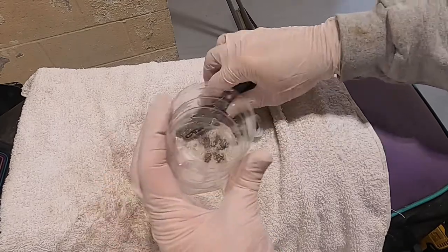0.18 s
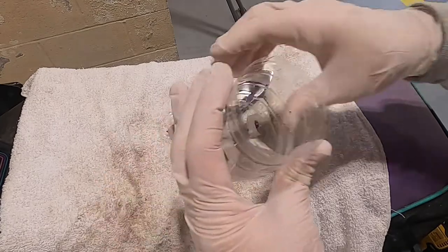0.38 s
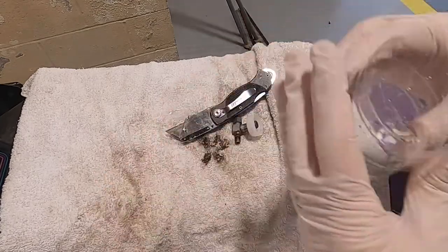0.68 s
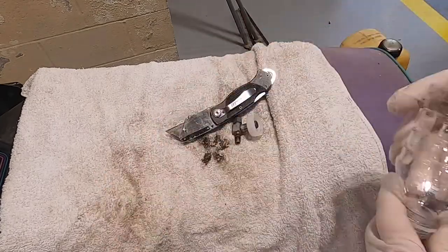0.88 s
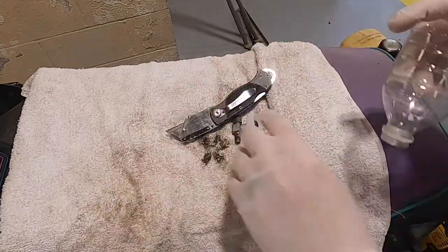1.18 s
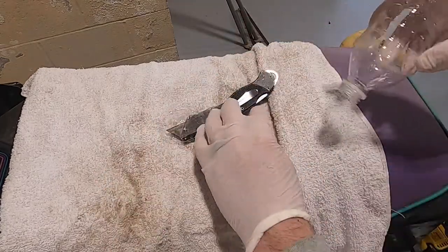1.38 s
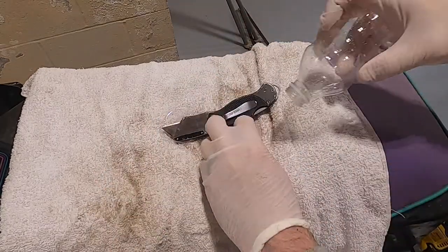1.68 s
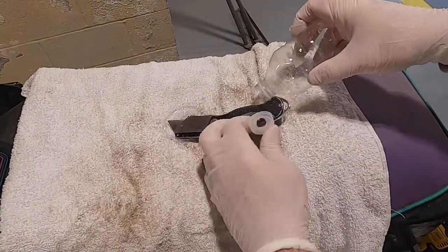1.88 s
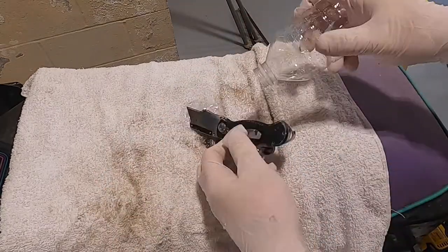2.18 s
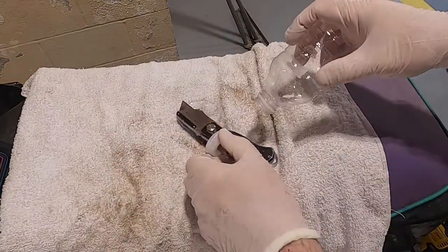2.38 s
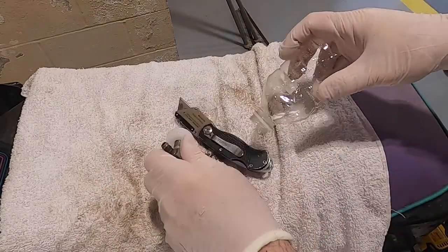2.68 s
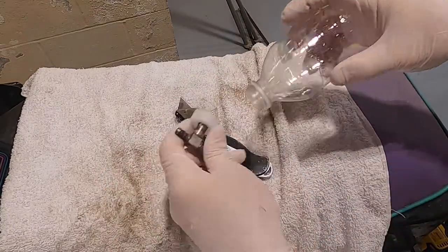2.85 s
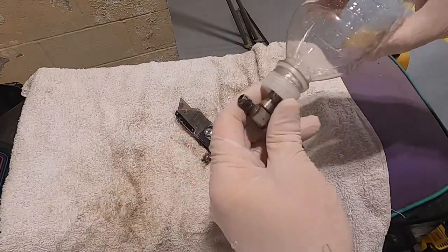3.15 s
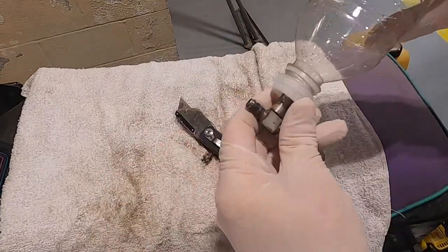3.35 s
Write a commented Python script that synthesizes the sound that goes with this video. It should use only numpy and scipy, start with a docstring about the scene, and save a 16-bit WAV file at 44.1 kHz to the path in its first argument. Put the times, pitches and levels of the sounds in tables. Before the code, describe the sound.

A squeezed plastic bottle clicks and crinkles, pops loudly once, then gets light taps at its neck

```python
"""In a quiet workshop, air noise, soft hiss and a low hum (which fades early) lie under a table's low sway.
Gloved hands turn a thin plastic bottle over a towel-covered table: filtered noise makes their rubs and scuffs.
From 0.22 s its wall snaps (damped tones with a noise crack), and creases crackle and tick (runs of tiny slips).
Near 1.9 s the whole bottle pops (body tones and airy noise); snaps return at 2.35 s and 2.69 s, the last
with the strongest of several soft table bumps. From 3.1 s a metal fitting taps and scrapes in the neck."""
import sys
import numpy as np
from scipy import signal
from scipy.fft import rfft, irfft, next_fast_len
from scipy.io import wavfile
from scipy.ndimage import uniform_filter1d, map_coordinates

SR = 44100
rng = np.random.default_rng(int(sys.argv[2]) if len(sys.argv) > 2 else 0)


def log_audio(samples):
    """Write samples as a 16-bit WAV file to the path given in sys.argv[1]."""
    # one column per channel
    frames = np.atleast_2d(samples).T
    # limit to full scale, then quantise
    limited = np.clip(frames, -1, 1)
    pcm = np.round(limited * 32767).astype(np.int16)
    wavfile.write(sys.argv[1], SR, pcm)


N = 154350  # samples: 3.5 s


def amp(db):
    """Turn decibels into a gain."""
    return 10 ** (np.asarray(db) / 20)


def unit(x):
    """Scale to an rms of 1."""
    return x / np.sqrt(np.mean(x ** 2) + 1e-20)


def with_energy(x, energy):
    """Scale x to a given sum of squares."""
    return x * np.sqrt(energy / (np.sum(x ** 2) + 1e-20))


def seconds(length):
    """Make a time axis in seconds."""
    return np.arange(int(length * SR)) / SR


def along(points, hz):
    """Read (f/Hz, value) points on a log frequency axis."""
    f, value = np.transpose(points)
    return np.interp(np.log(hz + 1), np.log(f + 1), value)


def curve(rows):
    """Read (t/s, value) points at every sample."""
    return np.interp(np.arange(N) / SR, *np.transpose(rows))


def wobble(rate):
    """Make a smooth random curve with `rate` knots a second."""
    knots = rng.standard_normal(int(N * rate / SR) + 4)
    return map_coordinates(knots, [np.arange(N) * rate / SR])


def add(track, s, x):
    """Mix x into the track at time s."""
    part = track[max(round(s * SR), 0):][:len(x)]
    part += x[:len(part)]


def noise(points):
    """Make steady noise of rms 1 with the given spectrum."""
    m = next_fast_len(N + SR // 4)
    spectrum = rfft(rng.standard_normal(m)) * amp(along(points, np.fft.rfftfreq(m, 1 / SR)))
    return unit(irfft(spectrum, m)[:N])


def dying(t60, t):
    """Make noise that falls by 60 dB in t60 seconds."""
    return rng.standard_normal(len(t)) * amp(-60 * t / t60)


def ring(modes, t):
    """Add up damped sines from (f/Hz, level/dB, t60/s) rows."""
    return sum(amp(db - 60 * t / t60) * np.sin(2 * np.pi * hz * t) for hz, db, t60 in modes)


def colour(x, points, lift=lambda hz: 0, size=4096):
    """Filter x with the given spectrum plus a lift in dB, without any sound ahead of its cause."""
    hz = np.fft.rfftfreq(size, 1 / SR)
    cepstrum = irfft(np.log(amp(along(points, hz) + lift(hz)) + 1e-6))
    # folding the cepstrum forward in time gives a minimum-phase filter
    cepstrum[1:size // 2] *= 2
    cepstrum[size // 2 + 1:] = 0
    response = irfft(np.exp(rfft(cepstrum)))
    return signal.fftconvolve(x, response)[:len(x)]


def resonance(centre_hz, lift_db, width, tilt_db):
    """Shape a bell in dB (width in octaves) on a slope in dB per octave."""
    def lift(hz):
        octaves = np.log2((hz + 1) / centre_hz)
        bell = lift_db * np.exp(-(octaves / width) ** 2 / 2)
        return bell + tilt_db * np.clip(octaves, -2, 2)
    return lift


# spectrum of the room's air noise: f/Hz, level/dB
AIR = [(180, 6), (300, 7.5), (620, -11.5), (1020, 7), (1420, -3.5), (3000, -33), (5000, -27), (9000, -25),
       (15000, -41.5)]
AIR_DB = -67
# spectrum of the soft hiss: f/Hz, level/dB
HISS = [(300, -8), (700, -2), (1300, 0.5), (2900, 1), (4500, -3.5), (7300, -12.5), (9200, -14.5),
        (12000, -28.5), (14000, -35), (15200, -49)]
# middle level of the hiss, before its waver: t/s, level/dB
HISS_LEVEL = [(0, -58.5), (.15, -63), (.7, -66), (1.2, -66.5), (1.5, -64.5), (2.8, -66.5), (2.97, -68.5),
              (3.05, -75.5), (3.17, -71.5), (3.3, -65), (3.41, -80), (3.5, -66)]
HISS_WAVER_DB = 1.8
# tones of a distant machine: f/Hz, level/dB
HUM = [(72, -51), (146, -62)]
# rise and fall of the hum, added to its tones' levels: t/s, level/dB
HUM_LEVEL = [(0, 4.5), (.6, 6), (1.2, -1), (1.6, -19.5), (3.5, -51)]


def workshop():
    """Steady air noise, a hiss of wavering level, and hum tones whose phase drifts."""
    t = np.arange(N) / SR
    hum = sum(amp(db) * np.sin(2 * np.pi * hz * t + 1.9 * wobble(6)) for hz, db in HUM)
    hiss = amp(curve(HISS_LEVEL) + HISS_WAVER_DB * wobble(28)) * noise(HISS)
    return amp(AIR_DB) * noise(AIR) + hiss + amp(curve(HUM_LEVEL)) * hum


# spectrum of the table's low sway: f/Hz, level/dB
SWAY = [(20, -34.5), (36, -12), (48, 6), (54, 2.5), (65, -6.5), (120, -49), (400, -97)]
# level of the sway: t/s, level/dB
SWAY_LEVEL = [(0.0, -54), (0.32, -45.5), (0.37, -63), (1.19, -63), (1.42, -47), (1.48, -62), (1.66, -38.5),
              (1.74, -74), (1.84, -39), (2.1, -54), (2.19, -38.5), (2.6, -46.5), (2.69, -37), (2.9, -41),
              (2.94, -51), (3.13, -40.5), (3.3, -46), (3.5, -68)]
# spectrum of the handling rumble: f/Hz, level/dB
RUMBLE = [(30, -7), (55, -17), (72, 0), (95, -1.5), (145, -1.5), (200, -8.5), (300, -23), (500, -39),
          (1500, -62)]
# level of the rumble: t/s, level/dB
RUMBLE_LEVEL = [(0.0, -55.5), (0.17, -55.5), (0.27, -54), (0.82, -53.5), (1.11, -61.5), (1.36, -51),
                (1.5, -49.5), (1.99, -53.5), (2.1, -51.5), (2.79, -49.5), (3.5, -53.5)]
# soft bumps through hand and table: t/s, level/dB, f/Hz, t60/s
BUMPS = [(0.253, -32, 75, 0.072), (0.266, -25.5, 185, 0.051), (0.292, -27.5, 85, 0.054),
         (0.44, -32, 177, 0.071), (1.598, -42, 238, 0.16), (1.62, -35, 200, 0.048),
         (2.344, -40, 212, 0.035), (2.503, -36, 287, 0.04), (2.6925, -13.5, 84, 0.067)]
BUMP_RISE_S = 0.0022


def table():
    """Handling sways the padded table as low noise; each soft bump is a low damped sine."""
    out, t = np.zeros(N), seconds(.5)
    for s, db, hz, t60 in BUMPS:
        soft_start = 1 - np.exp(-(t / BUMP_RISE_S) ** 2)
        add(out, s, ring([(hz, db, t60)], t) * soft_start)
    sway = noise(SWAY)
    local_power = np.abs(uniform_filter1d(sway ** 2, size=6000))
    sway = unit(sway / np.sqrt(local_power + .05))  # evens out its random swells
    return out + amp(curve(SWAY_LEVEL)) * sway + amp(curve(RUMBLE_LEVEL)) * noise(RUMBLE)


GRAIN_DB, GRAINS_PER_S = 3, 1400  # typical unevenness of the grip, and its random steps a second


def grip(count):
    """The uneven grip of rubber on plastic: noise whose level jitters quickly."""
    hiss = rng.standard_normal(count)
    knots = rng.standard_normal(count // 8)
    jitter = np.interp(np.arange(count) * GRAINS_PER_S / SR, np.arange(len(knots)), knots)
    return hiss * amp(GRAIN_DB * jitter)


def swell(t, db, rise, fall):
    """Climb 20 dB over the rise to a peak at t = 0, then drop 20 dB over the fall."""
    return amp(db - 20 * np.maximum(-t / rise, t / fall))


# glove strokes: t/s of the peak, level/dB, rise/s, fall/s, main resonance f/Hz, tilt/(dB per octave)
RUBS = [(.275, -46, 0.06, 0.067, 3020, 3.5), (0.419, -49.5, 0.044, 0.16, 2720, -2.5),
        (0.624, -59, 0.03, 0.096, 3950, -5), (0.818, -48, 0.067, 0.037, 2380, 1),
        (.892, -43, 0.034, 0.046, 1570, -0.5), (.96, -50, .1, 0.21, 1840, -5),
        (.997, -41, .09, 0.024, 3990, 2), (1.064, -52, 0.051, 0.12, 4200, 4),
        (1.125, -39.5, 0.064, 0.021, 1060, -0.5), (1.19, -52.5, 0.057, .08, 1060, -6),
        (1.293, -50, 0.022, 0.11, 4500, 1), (1.609, -50, 0.33, 0.11, 1900, -2.5),
        (1.721, -45.5, 0.071, 0.08, 2430, -5.5), (1.869, -49, 0.092, 0.15, 2700, 1),
        (2.22, -52, 0.54, 0.083, 2300, 2), (2.37, -51, 0.099, 0.15, 2940, -1),
        (2.509, -84, .06, 0.046, 2900, -3), (2.641, -60, 0.046, 0.22, 3070, 4),
        (2.859, -60.5, 0.061, 0.072, 2700, 5.5), (3.484, -50.5, 0.034, .1, 850, -4.5)]
# spectrum of glove on plastic: f/Hz, level/dB
GLOVE = [(150, -2), (350, -16), (650, -11.5), (950, -0.5), (1300, 1), (1700, 0.5), (2600, -4), (4000, -2.5),
         (5200, -12.5), (6500, -14.5), (8000, -21), (9500, -21), (12000, -38.5), (15000, -39)]
RUB_DB, RUB_OCTAVES = 9, 0.078  # lift and width of a stroke's main resonance


def gloves():
    """Grainy friction swells and fades with each stroke, stressing one resonance of the plastic."""
    out, t = np.zeros(N), seconds(1) - .5
    for s, db, rise, fall, hz, tilt_db in RUBS:
        rub = colour(grip(len(t)), GLOVE, resonance(hz, RUB_DB, RUB_OCTAVES, tilt_db))
        stroke = unit(rub) * swell(t, db, rise, fall)
        add(out, s - .5, stroke[t >= -s])  # drop anything before time zero
    return out


def patchy(x, depth_db):
    """The shifting grip favours one resonance, then another: random gains over pitch and time."""
    z = signal.stft(x, nperseg=512)[2]
    field = uniform_filter1d(rng.standard_normal(z.shape), size=4, axis=0)
    field = uniform_filter1d(field, size=7, axis=1)
    return signal.istft(z * amp(depth_db * unit(field)), nperseg=512)[1][:N]


# finger pads scuff the wall: t/s of the peak, level/dB, rise/s, fall/s
SCUFFS = [(0.276, -46, 0.034, 0.043), (0.456, -52.5, 0.046, .06), (0.638, -50, 0.015, .02),
          (1.62, -54.5, 0.099, 0.11), (1.73, -51.5, 0.069, 0.085), (1.96, -61.5, .05, 0.13),
          (2.231, -52, 0.067, 0.038), (2.418, -47, .01, 0.028), (2.508, -45.5, 0.037, 0.046),
          (2.699, -44.5, 0.014, 0.043), (2.869, -57.5, 0.049, 0.043)]
# spectrum of a finger pad: f/Hz, level/dB
PAD = [(80, -12.5), (180, 4), (320, 0), (500, -6.5), (650, -12.5), (1000, -15.5), (2000, -22), (8000, -52)]
# a dragging fingertip sounds the hollow body: t/s of the peak, level/dB, rise/s, fall/s, f/Hz
DRAGS = [(0.819, -46.5, 0.034, 0.029, 1000), (.826, -41, 0.014, 0.0073, 2270),
         (.893, -53, 0.025, 0.031, 1030), (.98, -50, 0.082, 0.025, 3980), (1.125, -37, 0.012, 0.015, 1015)]
DRAG_WIDTH = 0.085  # bandwidth over pitch


def fingertips():
    """Pads scuff softly as low-coloured friction; short drags excite one narrow resonance."""
    out, t = np.zeros(N), seconds(0.42) - .25
    for s, db, rise, fall in SCUFFS:
        scuff = unit(colour(grip(len(t)), PAD))
        add(out, s + t[0], scuff * swell(t, db, rise, fall))
    for s, db, rise, fall, hz in DRAGS:
        edges = [hz * (1 - DRAG_WIDTH / 2), hz * (1 + DRAG_WIDTH / 2)]
        band = signal.butter(2, edges, 'band', fs=SR, output='sos')
        drag = unit(signal.sosfilt(band, grip(len(t))))
        add(out, s + t[0], drag * swell(t, db, rise, fall))
    return out


# the wall buckles: t/s, level/dB, panel pitch f/Hz, t60/s, crack over ring level/dB
SNAPS = [(0.2242, -7, 2940, 0.013, -9), (0.227, -16.5, 2590, 0.014, -0.5), (0.236, -24, 2720, 0.01, -2.5),
         (0.262, -14.5, 3700, 0.0086, 2.5), (.2702, -19, 2440, .011, -19), (0.3003, -24.5, 2850, .011, -10),
         (0.3602, -26, 2870, 0.016, -10), (2.3470, -6.5, 2945, 0.0088, -4.5),
         (2.354, -19, 2850, 0.0059, -2), (2.6917, -16.5, 3020, 0.004, -1)]
# spectrum of cracking plastic, also for crackles, ticks and pop: f/Hz, level/dB
PLASTIC = [(100, -45), (250, -6), (600, -24), (1000, -6.5), (1500, -3), (2200, 3), (3200, 3), (4500, 1.5),
           (6200, -12), (7300, -18.5), (9000, -21), (11500, -33), (15000, -47)]
SPLINTER_DB, SPLINTER_T60_S = -3, 0.016  # fine slips behind a snap's first crack


def snaps():
    """A panel flips: a sharp crack, fine slips behind it, and a short ring at the panel's pitch."""
    out, t = np.zeros(N), seconds(.1)
    low_cut = signal.butter(2, 1000, 'high', fs=SR, output='sos')
    for s, db, hz, t60, crack_db in SNAPS:
        panel = ring([(hz, 0, t60)], t) * (1 - np.exp(-t / 0.00022))
        panel = signal.sosfilt(low_cut, panel)
        first_crack = t == 0
        splinters = with_energy(dying(SPLINTER_T60_S, t) * (t > .001), 0.75)
        crack = colour(first_crack + amp(SPLINTER_DB) * splinters, PLASTIC)
        crack = with_energy(crack, np.sum(panel ** 2))
        add(out, s, amp(db) * (panel + amp(crack_db) * crack))
    return out


SLIPS_PER_S, SLIP_SPREAD_DB = 900, 4


def slips(length, t):
    """A first slip sets off a random run of further slips, most of them smaller."""
    chance, size = rng.random(len(t)), rng.standard_normal(len(t))
    happens = (chance < SLIPS_PER_S / SR) * (t < length)
    run = happens * np.sign(size) * amp(SLIP_SPREAD_DB * (np.abs(size) - 1.5))
    run[0] = 1
    return run


# lasting resonances of the wall: f/Hz, level/dB before a random strength, t60/s
WALL = [(2040, -1, 0.041), (2176, 4, 0.02), (2505, 5, 0.017), (3042, -2, 0.037), (3424, -10, 0.027),
        (3764, -1, 0.018), (4400, 2, 0.029), (5654, 8.5, 0.022), (6150, 17.5, 0.015)]
WALL_DB, SLIP_T60_S = -5, 0.014  # gain of the lasting part; decay of the dense part


def wall_ring(t):
    """The wall answers a slip with dense dying noise and a few lasting modes, randomly struck."""
    lasting = sum(rng.normal() * ring([mode], t) for mode in WALL)
    dense = with_energy(dying(SLIP_T60_S, t), 0.92)
    return dense + amp(WALL_DB) * with_energy(lasting, 0.59)


# creases crackle: t/s, level/dB, length/s, pitch f/Hz, tilt/(dB per octave)
CRACKLES = [(0.26, -25.5, 0.01, 3170, 1.5), (0.278, -34, 0.0076, 2860, -6), (0.283, -37, .011, 2810, -5),
            (0.2967, -35.5, .006, 2500, -6), (0.31, -45, .004, 2600, -5), (0.337, -46, .005, 2900, -12),
            (0.362, -45, .005, 2300, -5), (0.373, -40.5, 0.0028, 2900, -1.5),
            (0.3815, -41, 0.0035, 2870, -1.5), (0.42, -38.5, 0.0024, 2420, -4),
            (0.4347, -41, 0.0042, 2000, -2), (0.453, -35, 0.002, 2170, -13.5),
            (0.5136, -32, 0.0019, 2720, -3.8), (0.534, -47, 0.0065, 2270, -7),
            (0.815, -40.5, 0.0064, 2040, -10), (1.3946, -46, 0.0044, 2400, 3),
            (1.4080, -43, 0.0034, 2800, -9.5), (1.4624, -39.5, 0.0018, 3150, -11.5),
            (1.4744, -42, 0.0011, 2790, 4.5), (1.5257, -30, 0.0033, 2650, -1),
            (1.5386, -50, 0.0034, 2680, -17), (1.579, -55, 0.012, 2780, 3), (1.5990, -44, 0.0053, 1900, 4),
            (1.613, -37.5, 0.0024, 1900, -8.5), (1.62, -38, 0.0036, 1710, -9.5),
            (1.7025, -45, 0.0026, 3000, 6), (1.7165, -34.5, 0.0027, 2950, -4.5),
            (1.7534, -26, 0.0017, 2860, -0.5), (1.7562, -28, 0.0019, 2900, -8.5),
            (1.7856, -36.5, 0.0037, 2730, -3), (1.792, -50, 0.0038, 2800, 3),
            (1.8266, -42.5, 0.0019, 2850, -7), (1.834, -44.5, 0.0059, 2970, -2),
            (1.964, -38, 0.0048, 4000, -1), (1.9720, -34, 0.0033, 2680, -1), (1.975, -30, 0.0033, 2730, -2),
            (2.005, -38.5, 0.0044, 3200, 2), (2.0159, -28.5, 0.0016, 2640, -2.5),
            (2.0947, -33.5, 0.0028, 2400, -0.5), (2.1415, -34.5, 0.0019, 3860, 6.5),
            (2.1727, -35, 0.004, 3940, 3), (2.203, -33.5, 0.0044, 2315, 0.5),
            (2.221, -36, 0.0065, 4300, 3.5), (2.2313, -40, 0.0084, 6550, 5), (2.254, -52, .003, 3600, 11),
            (2.2732, -43, 0.0026, 3970, 3), (2.2823, -45.5, .013, 6080, 2.5), (2.329, -34, 0.0021, 3550, 8),
            (2.3380, -35.5, 0.011, 3330, 4.5), (2.367, -45, 0.0027, 2700, 4),
            (2.4153, -36, 0.0041, 3150, 5), (2.433, -43, 0.0023, 2960, -4), (2.451, -31, 0.0032, 2520, -3),
            (2.46, -48, 0.006, 2530, 0.5), (2.487, -44, 0.0023, 2980, -4), (2.4951, -36, 0.0025, 2200, 4),
            (2.5045, -39, 0.0058, 2900, -1), (2.5174, -36.5, 0.0045, 2870, 1),
            (2.5913, -31, 0.0045, 3650, 0), (2.612, -47.5, 0.0057, 2680, -2),
            (2.63, -44, 0.0072, 3830, 1.5), (2.682, -35, 0.0043, 4860, 2.5), (2.7, -37, 0.0026, 2320, -5.5),
            (2.7820, -46.5, 0.0052, 4640, 5), (2.9646, -57, 0.0044, 3176, 3),
            (3.1056, -47, 0.0016, 4430, 0.5)]
PANEL_DB, PANEL_OCTAVES = 9.5, 0.091  # lift and width of a crease's own pitch


def crackles():
    """A crease gives way in a quick run of slips, each briefly ringing the thin wall."""
    out, t = np.zeros(N), seconds(.1)
    for s, db, length, hz, tilt_db in CRACKLES:
        burst = signal.fftconvolve(slips(length, t), wall_ring(t))[:len(t)]
        burst = colour(burst, PLASTIC, resonance(hz, PANEL_DB, PANEL_OCTAVES, tilt_db))
        add(out, s, amp(db) * with_energy(burst, length * SR))
    return out


# fine ticks while the fingers press: start t/s, end t/s, level/dB
PRESSES = [(0.271, 0.365, -50.5), (0.364, 0.535, -58.5), (1.569, 1.894, -58.5), (1.938, 2.025, -59),
           (2.152, 2.323, -55.5), (2.359, 2.722, -57)]
TICKS_PER_S, TICK_SPREAD_DB = 160, 0.5


def ticks():
    """Tiny creases tick at random under pressure, each ringing the wall."""
    out, t = np.zeros(N), seconds(.7)
    for start, end, db in PRESSES:
        chance, size = rng.random(len(t)), rng.standard_normal(len(t))
        happens = (chance < TICKS_PER_S / SR) * (t < end - start)
        run = happens * amp(TICK_SPREAD_DB * np.clip(size, -2, 2))
        sound = colour(signal.fftconvolve(run, wall_ring(t))[:len(t)], PLASTIC)
        add(out, start, amp(db) * with_energy(sound, (end - start) * SR))
    return out


# the whole bottle pops and rebounds: t/s, level/dB
POPS = [(1.8953, -5), (1.9003, -15.5), (1.9104, -27), (1.9208, -24.5), (1.9256, -24.5)]
# wall and air modes of the bottle: f/Hz, level/dB, t60/s
BOTTLE = [(230, -21, 0.031), (727, -18.5, .02), (883, -21, .16), (1300, -10.5, 0.014), (1560, -6.5, 0.014),
          (1900, -2.5, 0.0053), (2300, -11, 0.014), (3450, -10.5, 0.014), (4240, -8.5, 0.0058),
          (5790, -22, 0.0099), (8570, -22, 0.0067)]
# spectrum of the air's dense after-ring: f/Hz, level/dB
HOLLOW = [(200, -1), (600, -30), (900, 18.5), (1100, 6.5), (1550, 4), (2100, 11), (2900, -2), (4200, 0),
          (7000, -10), (14000, -33)]
HOLLOW_DB, HOLLOW_T60_S = -32, 0.45


def pop():
    """The whole body springs back with a crack and damped modes, and the air inside rings on."""
    out, t = np.zeros(N), seconds(.5)
    # neighbouring modes start in opposite directions
    body = sum((-1) ** k * ring([mode], t) for k, mode in enumerate(BOTTLE))
    body = body * (1 - np.exp(-t / 0.000078))
    for s, db in POPS:
        air = unit(colour(rng.standard_normal(len(t)), HOLLOW))
        air = air * amp(HOLLOW_DB - 60 * t / HOLLOW_T60_S)
        crack = amp(-4) * colour(dying(0.0078, t), PLASTIC)
        add(out, s, amp(db) * (body + air + crack))
    return out


# the fitting touches the neck: t/s, level/dB, length/s, scrape over ring level/dB
TAPS = [(3.106, -50, .003, 7), (3.1180, -31, .001, -13), (3.168, -48, .003, -25), (3.188, -44, .01, -8),
        (3.2003, -31.5, .006, 2), (3.206, -26, .002, -8), (3.222, -40.5, .012, -2),
        (3.236, -30, .008, -7.5), (3.254, -45.5, .004, -7), (3.302, -43.5, .005, -3),
        (3.347, -46.5, .003, -9), (3.45, -45, .012, -28.5), (3.4634, -37.5, .02, -14.5)]
# modes of the hollow neck: f/Hz, level/dB, t60/s
NECK = [(453, -15, 0.019), (786, -17.5, 0.031), (869, 1.5, 0.027), (1000, -25.5, 0.025)]
# spectrum of the scrape: f/Hz, level/dB
SCRAPE = [(150, 3), (500, -0.5), (1000, 6.5), (1500, -10), (2500, -4), (3700, -8.5), (4800, -9),
          (7000, -17), (10000, -28), (14500, -56)]


def neck_taps():
    """The fitting catches on the rim in a run of slips that scrape and sound the hollow neck."""
    out, t = np.zeros(N), seconds(.2)
    note = ring(NECK, t)
    energy = np.sum(note ** 2)
    for s, db, length, scrape_db in TAPS:
        run = slips(length, t)
        hollow = with_energy(signal.fftconvolve(run, note)[:len(t)], energy)
        scrape = signal.fftconvolve(run, dying(0.015, t))[:len(t)]
        scrape = with_energy(colour(scrape, SCRAPE), energy)
        add(out, s, amp(db) * (hollow + amp(scrape_db) * scrape))
    return out


# decay of the room's tail: f/Hz, t60/s
ROOM = [(200, 0.62), (1500, 0.54), (4000, 0.15), (10000, 0.61)]
ROOM_DB, WIDTH = -17, 0.1  # gain of the tail; share of left-right difference
NEAR_DB, NEAR_T60_S = -18.5, 0.15  # nearby surfaces


def room(x):
    """Nearby surfaces and a faint tail answer as dying noise, slightly different left and right."""
    hz, t, z = signal.stft(rng.standard_normal((2, SR // 2)), SR, nperseg=256)
    decay = amp(-60 * t / along(ROOM, hz)[:, None])
    tails = signal.istft(z * decay, SR, nperseg=256)[1]
    t = np.arange(tails.shape[1]) / SR
    answers = []
    for tail in tails:
        far = with_energy(tail * (t > .004), 0.52)
        near = with_energy(dying(NEAR_T60_S, t) * (t > .002), 0.77)
        answers.append(amp(ROOM_DB) * far + amp(NEAR_DB) * near)
    mid, side = [signal.fftconvolve(x, answer)[:N] for answer in answers]
    return np.array([mid + WIDTH * side, mid - WIDTH * side])


# left-right difference of the bottle's direct sound, over its middle: f/Hz, level/dB
SIDE = [(100, -57), (800, -45), (2000, -43), (4000, -25.5), (9000, -20.5), (13000, 5)]


def scene():
    """The bottle in the middle, its width mostly treble, over table rumble and room noise."""
    rubbing = patchy(gloves(), depth_db=3.5)
    bottle = rubbing + fingertips() + snaps() + crackles() + ticks() + pop() + neck_taps()
    scatter = with_energy(dying(.012, seconds(.02)), 0.61)
    side = colour(signal.fftconvolve(bottle, scatter)[:N], SIDE)
    return bottle + np.array([side, -side]) + room(bottle) + table() + workshop()


TOP_HZ = 15200


def record(dry):
    """Keep nothing at or above the band limit."""
    m = next_fast_len(N + SR // 2)
    keep = np.fft.rfftfreq(m, 1 / SR) < TOP_HZ
    return irfft(rfft(dry, m) * keep, m)[..., :N]


dry = scene()
out = record(dry)
log_audio(out)
```